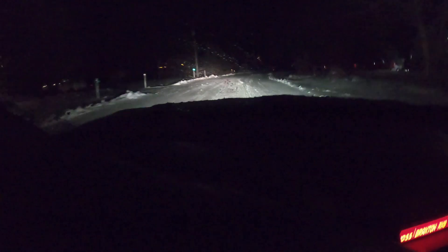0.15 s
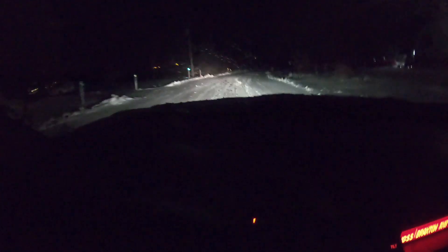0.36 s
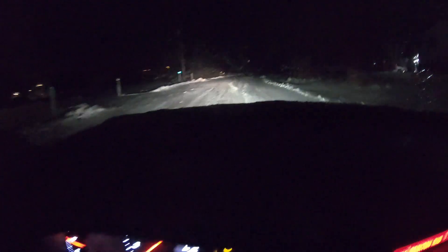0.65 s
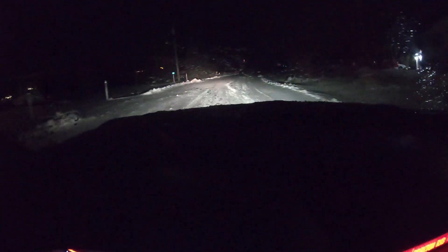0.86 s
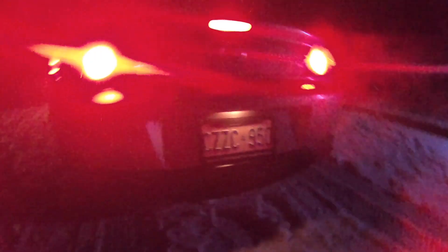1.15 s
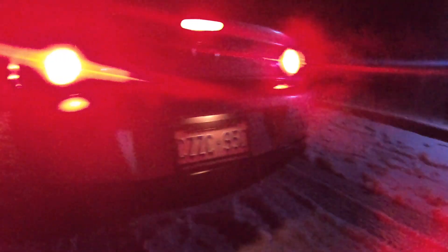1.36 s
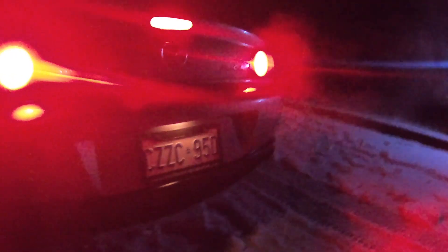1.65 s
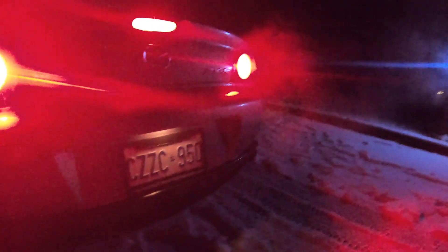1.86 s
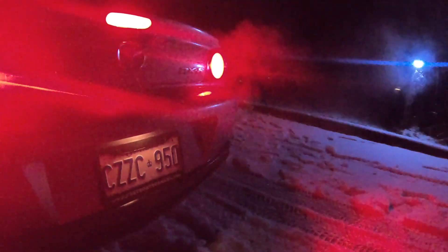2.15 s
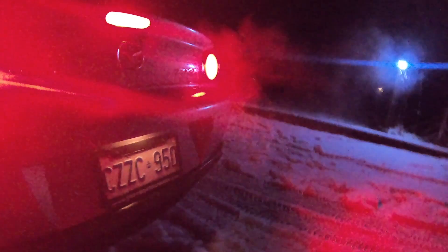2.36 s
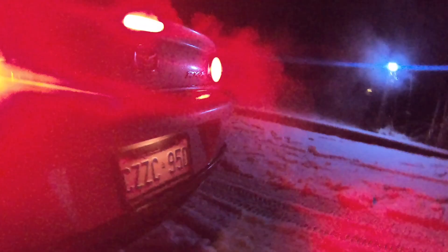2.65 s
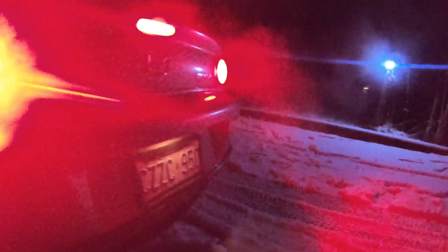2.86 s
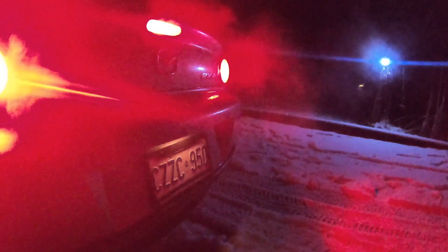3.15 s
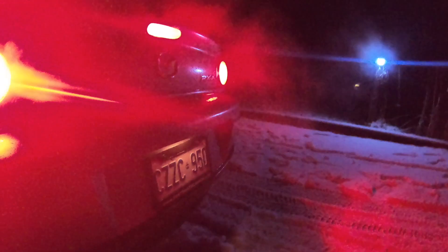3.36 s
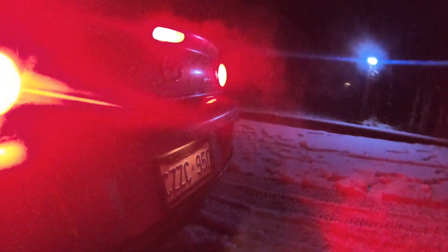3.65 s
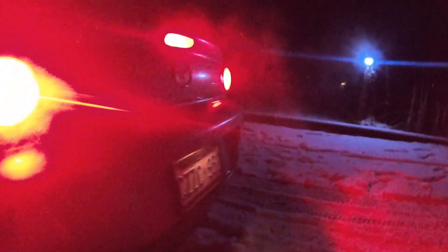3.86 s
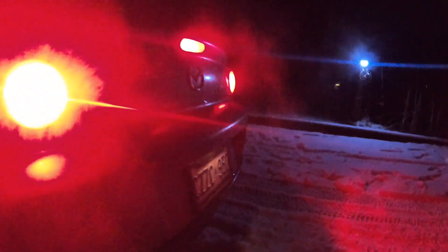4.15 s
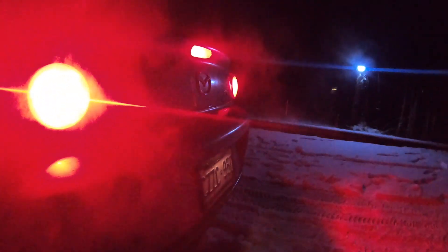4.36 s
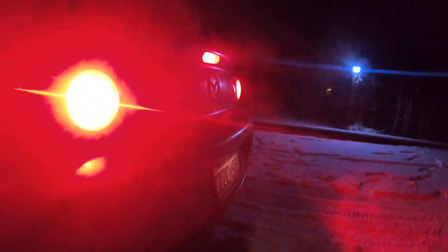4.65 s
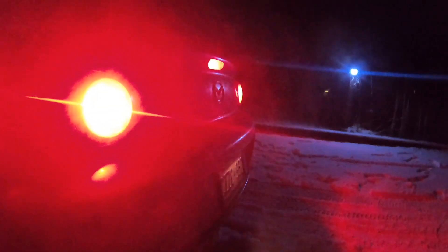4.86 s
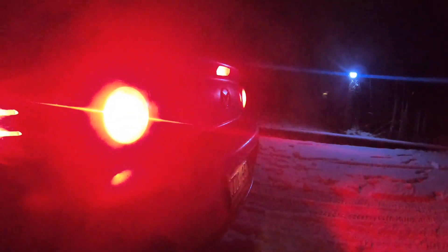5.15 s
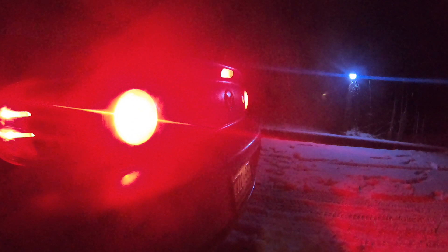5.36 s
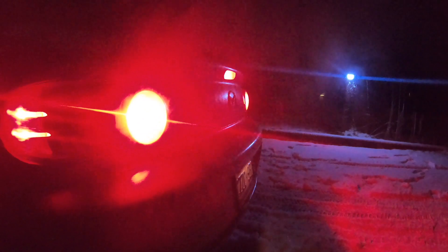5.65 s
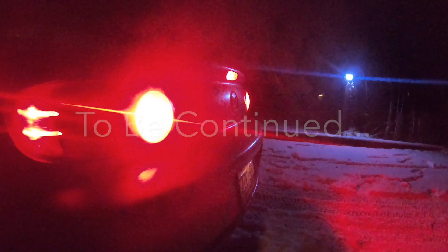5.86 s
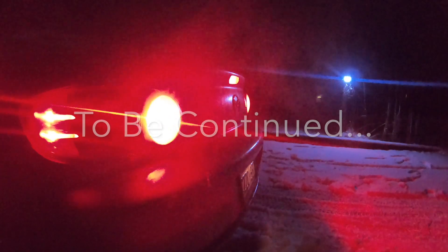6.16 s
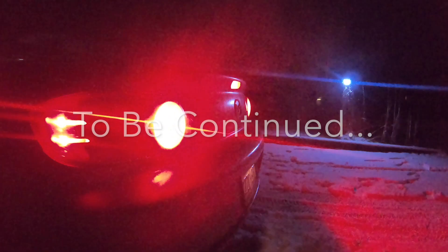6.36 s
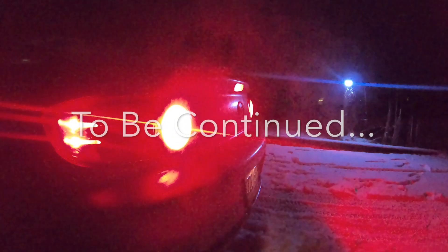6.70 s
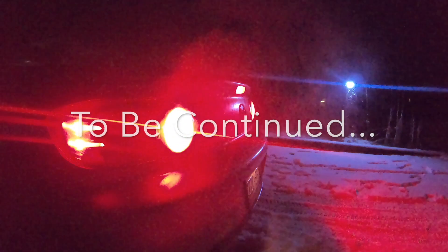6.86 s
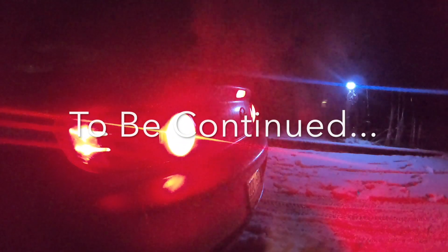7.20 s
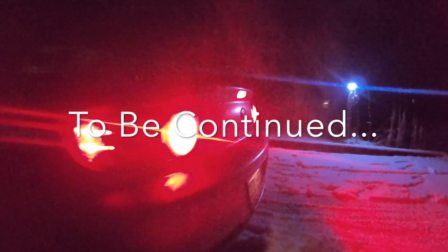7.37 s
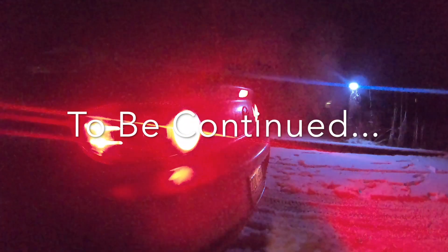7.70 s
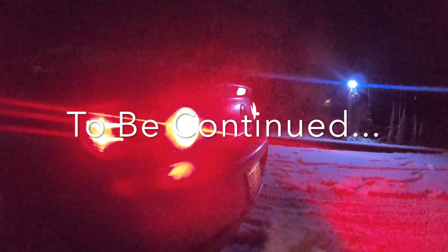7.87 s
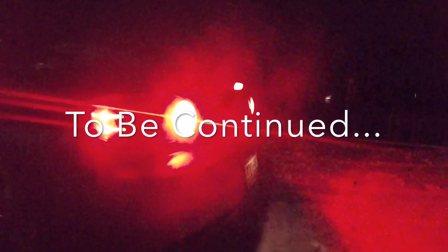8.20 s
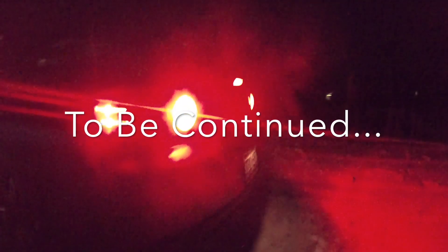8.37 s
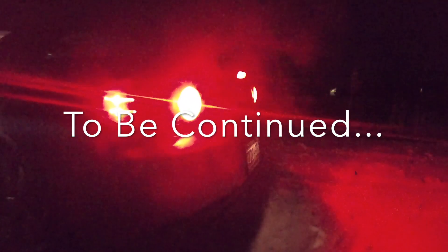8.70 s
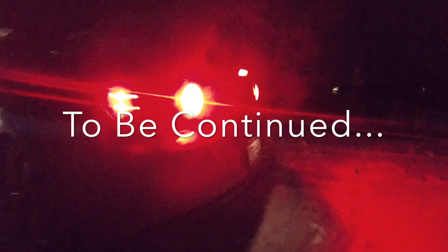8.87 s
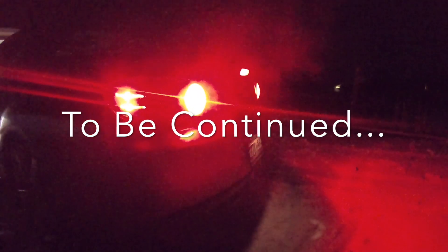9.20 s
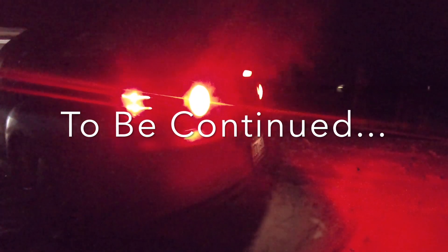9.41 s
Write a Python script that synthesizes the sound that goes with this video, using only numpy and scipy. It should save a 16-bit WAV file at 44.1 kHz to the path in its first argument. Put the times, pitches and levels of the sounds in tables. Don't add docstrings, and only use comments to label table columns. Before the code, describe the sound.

One second of low driving rumble inside a car, then a close throbbing, popping two-rotor tailpipe idle with hissing gas, metallic buzz and icy footsteps.

```python
import sys
import numpy as np
from scipy import signal
from scipy.io import wavfile
from scipy.ndimage import uniform_filter1d

SR = 44100
rng = np.random.default_rng(int(sys.argv[2]) if len(sys.argv) > 2 else 0)


def to_wav(s):
    ch = np.atleast_2d(s).T
    pcm = np.round(np.clip(ch, -1, 1) * 32767)
    wavfile.write(sys.argv[1], SR, pcm.astype(np.int16))


def boost_factor(decibels):
    exponent = np.asarray(decibels, float) / 20
    return 10 ** exponent


N = 420706
CUT_S = 0.998

# time_s, place (0 beside the outlet, 1 a few steps back)
CAMERA_PLACE = [
    (2.05, 0),
    (3, .4),
    (4.05, .69),
    (5.25, .9),
    (6.5, .98),
    (9.6, 1),
]
# hz, likeness
STREET_LIKENESS = [(300, 1), (700, 0.65), (1300, 0.43), (2300, -0.082), (4000, 0.68), (7000, -0.16),
                   (11000, 0.53)]


def evened(x):
    return x / np.sqrt(np.mean(x ** 2) + 1e-20)


def along(rows):
    s, *columns = np.transpose(rows)
    return [np.interp(np.arange(N) / SR, s, c) for c in columns]


def add(mix, start_s, sound):
    part = mix[:, round(start_s * SR):][:, :sound.shape[1]]
    part += sound[:, :part.shape[1]]


def resonate(x, hz, width_hz):
    pole = np.exp((2j * hz - width_hz) * np.pi / SR)
    return 2 * signal.lfilter([1 - abs(pole)], [1, -pole], x).real


def panned(x, left_right_db):
    return x * boost_factor(np.array([[left_right_db], [-left_right_db]]) / 2)


def noise(colour, likeness, patchy_db, size=1024):
    hz = np.fft.rfftfreq(size, 1 / SR)

    def read(rows):
        rows_hz, values = np.transpose(rows)
        return np.interp(np.log(hz + 1), np.log(rows_hz + 1), values)[:, None]

    a, b, c, d, patches = rng.standard_normal((N * 4 // size + 5, len(hz), 5)).T
    patches = uniform_filter1d(patches, size=9, axis=0)
    patches = evened(uniform_filter1d(patches, size=9, axis=1))
    like = np.clip(read(likeness), -1, 1)
    left = a + 1j * b
    right = like * left + np.sqrt(1 - like ** 2) * (c + 1j * d)
    z = np.array([left, right]) * boost_factor(read(colour) + patchy_db * patches)
    return evened(signal.istft(z, nperseg=size, noverlap=size * 3 // 4)[1][:, :N])


def heard(levels_db, swing_db=0, warm_db_per_s=0):
    swing_s, warm_s = 1, 3.2
    t = np.arange(N) / SR
    near_db, far_db = levels_db
    level_db = near_db + (far_db - near_db) * along(CAMERA_PLACE)[0]
    level_db = level_db + swing_db * np.clip(1 - (t - CUT_S) / swing_s, 0, 1)
    return level_db + warm_db_per_s * np.maximum(t - warm_s, 0)


def firings(weak_share, uneven_db, draw):
    # time_s, crank_turns_per_s
    idle = [(1.0, 12.497), (1.35, 12.486), (1.79, 13.02), (2.25, 13.105), (2.75, 13.343), (3.26, 13.264),
            (3.78, 13.609), (4.32, 13.446), (4.88, 13.604), (5.44, 13.876), (6.01, 13.689), (6.59, 14.017),
            (7.18, 13.866), (7.77, 14.01), (8.38, 13.914), (8.98, 14.11), (9.6, 13.79)]
    first_strong_s, lead_s, weak_at_turn = 1.0096, 0.00795, 0.494
    s = np.arange(N) / SR
    turns = np.cumsum(along(idle)[0]) / SR
    turns = turns - np.interp(first_strong_s - lead_s, s, turns)
    count = np.arange(2 * int(turns[-1]) + 1)
    at = np.interp(count // 2 + weak_at_turn * (count % 2), turns, s) * SR
    train = np.zeros(N)
    train[at.astype(int)] = np.where(count % 2, weak_share, 1) * boost_factor(uneven_db * draw[:len(at)])
    return train


def pipe_boom(draw):
    # ring_hz, width_hz, signed strength_near, signed strength_far
    pipe_modes = [(25.2, 20.1, 0.069, 0.039), (41.9, 6.0, -0.31, -0.199), (59.6, 15.8, 0.092, 0.108),
                  (86.1, 10.8, 0.39, 0.168), (127.7, 28.4, 0.597, 0.148), (139.9, 23.0, -0.636, -0.114),
                  (172.1, 19.5, -0.394, 0.119), (176.0, 20.4, 0.366, -0.151), (221.1, 6.0, 0.002, -0.014),
                  (244.3, 8.8, -0.003, -0.004), (273.5, 11.6, 0.006, -0.016), (307.5, 25.7, -0.181, -0.02),
                  (313.1, 24.8, 0.168, 0.034), (365.9, 32.9, 0.007, 0.006)]
    upper_hz, abreast_db = 200, 3.1
    place = along(CAMERA_PLACE)[0]
    t = np.arange(SR // 2) / SR
    upper_db = heard((0.1, 1.5)) + abreast_db * np.sin(np.pi * place) ** 2
    port_opening = np.hanning(91) / 45
    fired = signal.oaconvolve(firings(0.527, 0.8, draw[0]), port_opening, "same")
    boom = np.zeros(N)
    for hz, width_hz, near, far in pipe_modes:
        ring = np.exp(-np.pi * width_hz * t) * np.sin(2 * np.pi * hz * t)
        strength = (near + place * (far - near)) * boost_factor(upper_db * (hz > upper_hz))
        boom += strength * signal.fftconvolve(fired, ring)[:N]
    return boost_factor(heard((2.5, 6), -1.7)) * boom


def tip_pop(draw):
    # ring_hz, width_hz, level_db
    tip_rings = [(582, 87, 6), (695, 650, -10.5), (940, 130, -6)]
    # ring_hz, width_hz, level_db
    near_hz, near_width_hz, near_db = (800, 100, 1.5)
    echo_s, echo_near, echo_far = 0.002865, 0.39, 0.096
    place = along(CAMERA_PLACE)[0]
    gust = np.hanning(260) * np.cos(2 * np.pi * 650 * (np.arange(260) - 130) / SR)
    pop, pushes = 0, []
    for k, (hz, width_hz, db) in enumerate(tip_rings):
        train = firings(0.33, 1.5, draw[0] + 1.3 * np.roll(draw[1], 50 * k))
        pushes.append(np.roll(signal.oaconvolve(train, gust)[:N], -122))
        pop = pop + boost_factor(db) * resonate(pushes[-1], hz, width_hz)
    pop = pop + (1 - place) ** 2 * boost_factor(near_db) * resonate(pushes[-1], near_hz, near_width_hz)
    pop = pop + (echo_near + place * (echo_far - echo_near)) * np.roll(pop, round(echo_s * SR))
    pop = signal.sosfilt(signal.butter(3, 500, "high", fs=SR, output="sos"), pop)
    return pop * boost_factor(heard((-25, -25), -9) - 13) / np.sqrt(np.mean(pop[SR:] ** 2))


def puffs(train):
    t = np.arange(SR // 2) / SR
    puff = (1 - np.exp(-t / 0.00034)) * np.exp(-t / 0.018)
    return signal.oaconvolve(train, puff)[:N]


def gas_jet(draw):
    # hz, db_per_hz
    jet_colour = [(1470, -21.5), (2500, -6.5), (2760, -15.5), (4060, -9), (4540, -2.5), (8700, -11),
                  (12000, -13), (15600, -70), (22000, -120)]
    blow = evened(puffs(firings(0.45, 4.0, np.clip(draw[2] + 0.5 * draw[0], -2, 1.6))))
    return blow * noise(jet_colour, STREET_LIKENESS, 0.9, size=256)


def heat_shield():
    # ring_hz, width_hz, level_db
    shield_rings = [(2770, 58, 1.5), (3500, 140, -5.5), (4550, 620, -4.5), (5270, 22, -0.5),
                    (6160, 240, -12), (7530, 330, -12.5)]
    shaken = rng.standard_normal((2, N))
    shaken = shaken[0] + 0.86 * shaken
    draws = np.clip(rng.standard_normal((400, len(shield_rings))).T, -2, 1.8)
    buzz = np.zeros((2, N))
    for draw, (hz, width_hz, db) in zip(draws, shield_rings):
        buzz += boost_factor(db) * resonate(puffs(firings(0.41, 4.4, draw)) * shaken, hz, width_hz)
    return evened(buzz)


def exhaust():
    draw = rng.standard_normal((400, 3)).T
    hiss_db = heard((-58.5, -60.5), -1, 1.39)
    hiss = boost_factor(hiss_db) * (gas_jet(draw) + boost_factor(-2.5) * heat_shield())
    return panned(pipe_boom(draw) + tip_pop(draw), -0.55) + hiss


def engine_bay():
    # hz, db_per_hz
    wash_colour = [(120, -21.5), (200, -3.5), (297, -22.5), (358, -15), (471, -17), (620, -16), (858, -21),
                   (1510, -24.5), (2400, -31), (2750, -33), (3210, -34), (5270, -42), (12000, -53.5),
                   (15600, -92), (22000, -120)]
    # pitch_hz, level_db
    whines = [(412, -53.5), (1150, -64), (1450, -64), (1620, -68), (2740, -69.5), (3470, -72), (5215, -74),
              (5533, -85)]
    wander = uniform_filter1d(rng.standard_normal((len(whines), N)), size=9000) * 60
    whine = np.zeros(N)
    for (hz, db), w in zip(whines, wander):
        phase = 2 * np.pi * np.cumsum(hz * (1 + 0.0043 * w)) / SR
        whine += boost_factor(db + 1.3 * w) * np.sin(phase)
    whine *= 0.41 + 1.45 * along(CAMERA_PLACE)[0]
    flutter_colour = [(15, -15.5), (40, 4.0), (150, -4.0), (330, -24), (500, -51.5)]
    flutter = boost_factor(-32.5) * noise(flutter_colour, [(20, 0.39), (300, 0.95)], 0.7, size=2048)
    wash = boost_factor(heard((-42.5, -42), 0, 0.64)) * noise(wash_colour, STREET_LIKENESS, 1.8)
    return wash + flutter + panned(whine, 1.7)


def snaps(events, body, tail_db, edge_db):
    out, t = np.zeros((2, N)), np.arange(2600) / SR
    lowpass = signal.butter(4, 3300, "low", fs=SR, output="sos")
    shapes = rng.standard_normal((len(events), 3, len(t)))
    for (start_s, db, pan_db, hz, ms), (a, b, c) in zip(events, shapes):
        decay = np.exp(-(1000 * t / ms) ** 2) + boost_factor(tail_db) * np.exp(-t / 0.005)
        burst = np.minimum(t / 0.0019, 1) * decay
        crack = 0.5 * a * burst + 3.57 * (np.arange(len(t)) == 30)
        low = np.zeros(len(t))
        for k, width_hz, gain_db in body:
            low += boost_factor(gain_db) * resonate(resonate(crack, k * hz, width_hz), k * hz, width_hz)
        low = panned(signal.sosfilt(lowpass, low), pan_db)
        edge = resonate(resonate(np.array([b, c]) * burst, 6000, 5000), 6000, 5000)
        low_part = boost_factor(db) * low / abs(low.mean(0)).max()
        edge_part = boost_factor(edge_db) * panned(edge, 0.4 * pan_db) / abs(edge).max()
        add(out, start_s, low_part + edge_part)
    return out


def boots():
    # start_s, peak_db, ring_hz, length_ms
    crust_snaps = [(1.308, -20.5, 1660, 7.1), (1.326, -17.5, 1280, 5.6), (1.3428, -16.5, 1290, 5.2),
                   (1.376, -16.5, 851, 6.8), (1.3844, -26, 1100, 1.8), (1.4097, -19.5, 1300, 2.9),
                   (1.438, -14.5, 870, 4.1), (1.912, -25.5, 1220, 5.1), (1.9697, -8, 890, 2.5),
                   (2.007, -12, 872, 2), (2.0532, -20.5, 930, 7.6), (2.2615, -22, 1400, 3.8),
                   (2.8997, -13, 1120, 3.2), (3.627, -20.5, 1470, 3.6), (3.703, -10, 1260, 2.7),
                   (3.722, -14.5, 850, 1.9), (3.752, -19, 920, 8.2), (3.802, -23, 844, 3.6),
                   (4.334, -28, 988, 3.3), (4.438, -23.5, 840, 4.4), (4.447, -22, 1080, 3.4),
                   (6.3808, -12, 1140, 4.1), (6.4137, -21.5, 931, 1.4), (6.4427, -10.5, 1040, 3.8),
                   (6.984, -11, 935, 2), (7.1872, -23, 1330, 7.7), (7.2398, -14.5, 1350, 5),
                   (7.417, -23, 845, 1.9), (8.2146, -17, 1500, 3), (8.231, -12.5, 860, 2.7)]
    # multiple of ring_hz, width_hz, level_db
    crust_body = [(0.55, 580, 13), (1.0, 920, 31), (1.7, 1240, 6)]
    near_db, far_db = -7.5, -17.5
    pan_db = near_db + (far_db - near_db) * along(CAMERA_PLACE)[0]
    events = [(s, db, pan_db[int(s * SR)], hz, ms) for s, db, hz, ms in crust_snaps]
    return snaps(events, crust_body, -16, -45.5)


def crunch():
    # start_s, length_s, level_db, centre_hz
    packings = [(1.243, 0.14, -40, 1900), (1.343, 0.15, -43, 1800), (1.831, 0.12, -44.5, 3500),
                (1.94, 0.12, -44.5, 1500), (2.039, 0.081, -47, 6000), (2.9, 0.013, -30.5, 2310),
                (3.494, 0.18, -44, 1600), (3.655, 0.17, -43, 1600), (4.185, .15, -41.5, 2200),
                (4.292, 0.093, -46.5, 1600), (4.372, 0.017, -41, 1500), (1.273, .008, -43, 1800),
                (6.375, 0.11, -42.5, 1800), (7.167, .1, -58, 1600), (8.214, 0.022, -36.5, 1600)]
    # hz, db_per_hz
    grit_colour = [(300, -27), (800, 7.5), (2000, -5.5), (5000, -5), (10000, -10), (14000, -55)]
    breaks = rng.random(N) < 1500 / SR
    grains = boost_factor(2.2 * np.minimum(rng.exponential(1, N), 4)) * breaks
    grains = evened(signal.oaconvolve(grains, np.exp(-np.arange(300) / 60.0))[:N])
    grit = grains * noise(grit_colour, [(500, 0.63), (8000, 0.18)], 1.0, size=256)
    out = np.zeros((2, N))
    for start_s, length_s, db, hz in packings:
        part = grit[:, round(start_s * SR):round((start_s + length_s) * SR)]
        part = evened(resonate(part, hz, 0.75 * hz) + 0.25 * part)
        add(out, start_s, boost_factor(db) * part * signal.windows.tukey(part.shape[1], 0.7))
    return panned(out, -3)


def cabin_rumble():
    # hz, db_per_hz
    rumble_colour = [(12, -26.5), (30, 7.5), (48, -0.5), (68, 7), (92, -4), (130, 0), (160, -10.5),
                     (215, -15), (275, -25), (360, -26.5), (550, -32), (850, -35.5), (2050, -48.5),
                     (4340, -59), (9430, -68.5), (12000, -91)]
    # time_s, level_db
    rumble_level = [(0, -13.5), (.1, -22.5), (.2, -18), (.3, -19), (.5, -19), (.75, -19.5), (.9, -19.5),
                    (1, -20.5)]
    # hz, likeness
    rumble_likeness = [(60, 0.99), (130, 1.0), (290, 1), (640, -0.023), (1410, -0.45), (3100, 0.15),
                       (6820, 0.078), (15000, 0.41)]
    # time_s, pitch_hz, level_db
    hum = [(0, 365, -45), (.35, 362, -43), (.5, 351, -59), (1, 349, -66)]
    rumble = panned(noise(rumble_colour, rumble_likeness, 0.31, size=2048), -0.55)
    hz, db = along(hum)
    return boost_factor(along(rumble_level)[0]) * rumble + boost_factor(db) * np.sin(2 * np.pi * np.cumsum(hz) / SR)


def trim_rattles():
    # start_s, peak_db, left_right_db
    rattles = [(0.039, -47, -8), (0.179, -38, -4), (0.239, -53, -10), (0.357, -33.5, -3), (0.533, -50, 4),
               (0.626, -55, -6), (0.678, -31.5, -12), (0.804, -32, -9), (0.84, -38, -4), (0.901, -52, -6),
               (0.914, -38, 1), (0.944, -41, -2.5)]
    ring_hz, length_ms = 785, 3.5
    events = [(*row, ring_hz, length_ms) for row in rattles]
    return snaps(events, [(1.0, 353, 15), (1.8, 900, 2)], -7.5, -62.5)


def rubs_and_ticks():
    # start_s, length_s, level_db, centre_hz, width_hz
    rub_bursts = [(0.108, .05, -52, 6500, 7000), (0.724, .035, -49, 4250, 500),
                  (0.721, .045, -53, 8300, 4000), (0.029, .025, -55, 5450, 7000),
                  (0.502, .02, -59, 5500, 5000), (.975, .03, -56, 4000, 5000)]
    tick_starts = [.2, .218, .238, .53, .63, .652, .671, .811, .902, .922, .945]
    # length_s, level_db, centre_hz, width_hz
    tick = (.0042, -53, 5600, 5000)
    out = np.zeros((2, N))
    for start_s, length_s, db, hz, width_hz in list(rub_bursts) + [(s, *tick) for s in tick_starts]:
        rub = resonate(resonate(rng.standard_normal((2, 4000)), hz, width_hz), hz, width_hz)
        rub = rub[:, :int(length_s * SR)]
        shape = np.linspace(1, 0.3, rub.shape[1]) * signal.windows.tukey(rub.shape[1], 0.2)
        add(out, start_s, boost_factor(db) * evened(rub) * shape)
    return out


def cabin():
    return cabin_rumble() + trim_rattles() + rubs_and_ticks()


def scene():
    street = exhaust() + engine_bay() + boots() + crunch()
    fade = np.clip((np.arange(N) / SR - CUT_S) / 0.0073 + 0.5, 0, 1)
    return (1 - fade) * cabin() + fade * street


def low_pass(x):
    return signal.sosfilt(signal.butter(12, 15820, fs=SR, output="sos"), x)


def record(dry):
    lowpass = signal.firwin2(255, [0, 10100, 10600, 16000, SR / 2], [0.96, 0.58, 0.058, 0.012, 0.016], fs=SR)
    x = signal.oaconvolve(np.pad(dry, ((0, 0), (127, 127)), "reflect"), lowpass[None], "valid")
    deep = np.minimum(dry.mean(0), 0) ** 6
    swing = np.tanh(1.4 * evened(uniform_filter1d(deep, size=520)))
    ticking = np.arange(N) % round(SR / 375) == 0
    spits = ticking * rng.choice([-1.4, -0.7, 0.7, 1.4], N) + 0.04 * rng.standard_normal(N)
    top = signal.firwin2(255, [0, 10300, 10700, 15000, 16500, SR / 2], [0.08, 0, 1, 0.65, 0.12, 0.027], fs=SR)
    x = x + boost_factor(-41.5) * signal.oaconvolve(swing * spits, top, "same")
    over = np.maximum(abs(x) - 0.68, 0)
    x = x - np.sign(x) * (over - 0.27 * np.tanh(over / 0.27))
    return low_pass(x)


dry = scene()
out = record(dry)
to_wav(out)
```